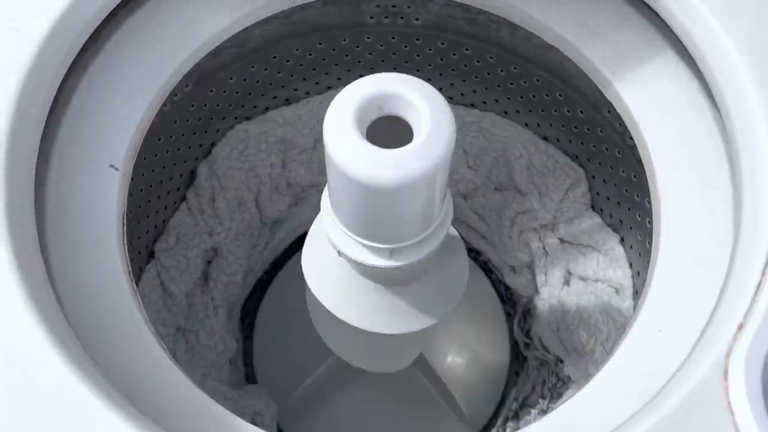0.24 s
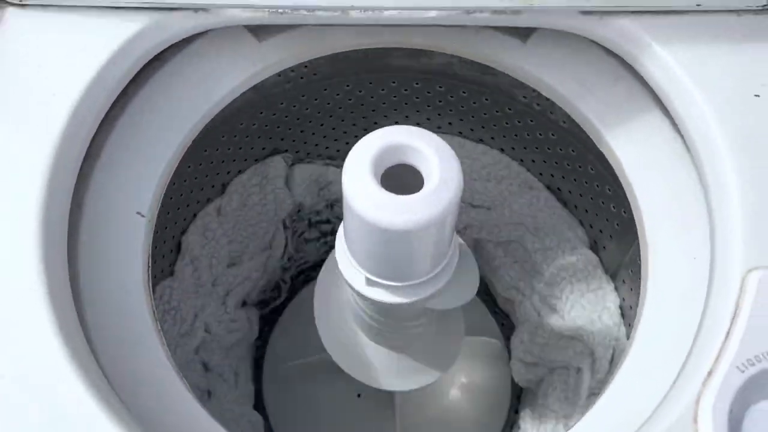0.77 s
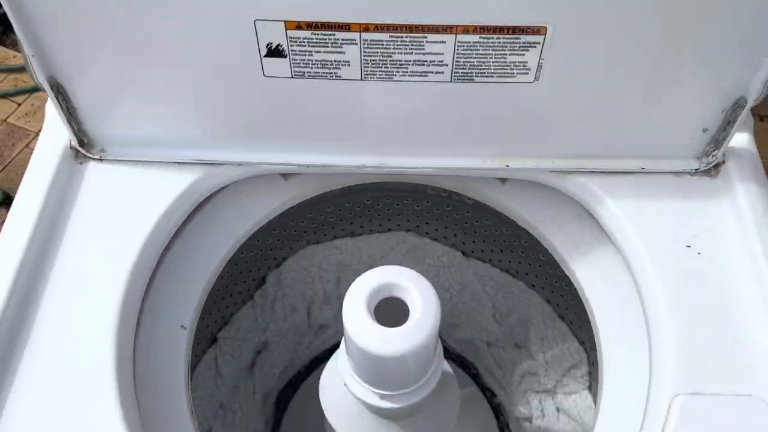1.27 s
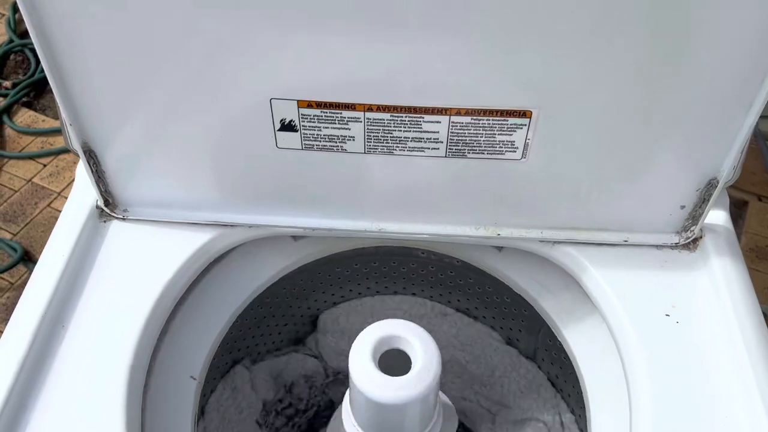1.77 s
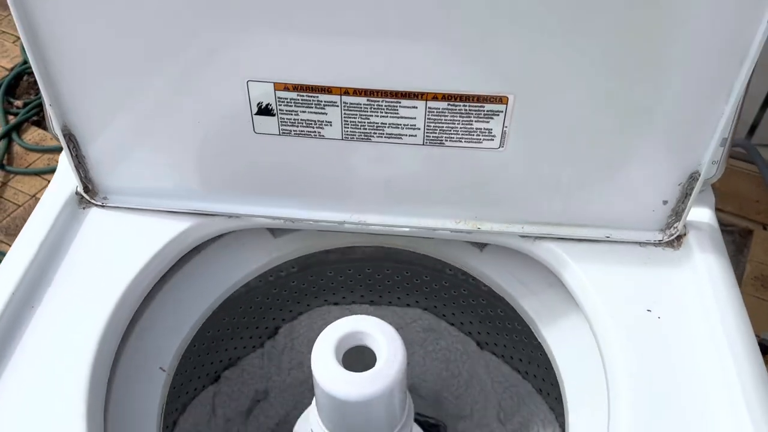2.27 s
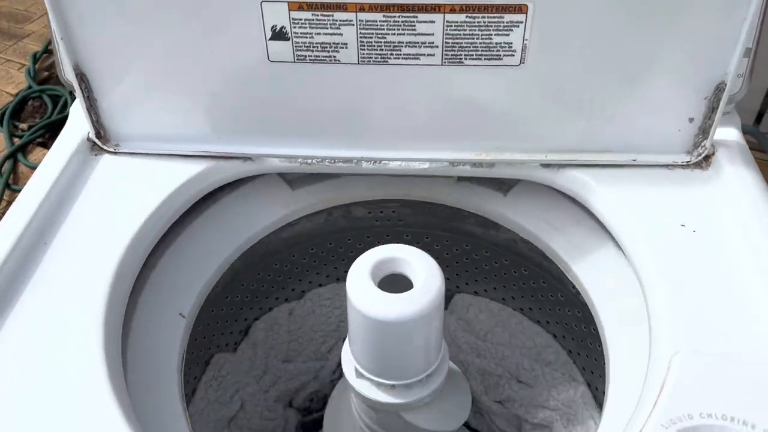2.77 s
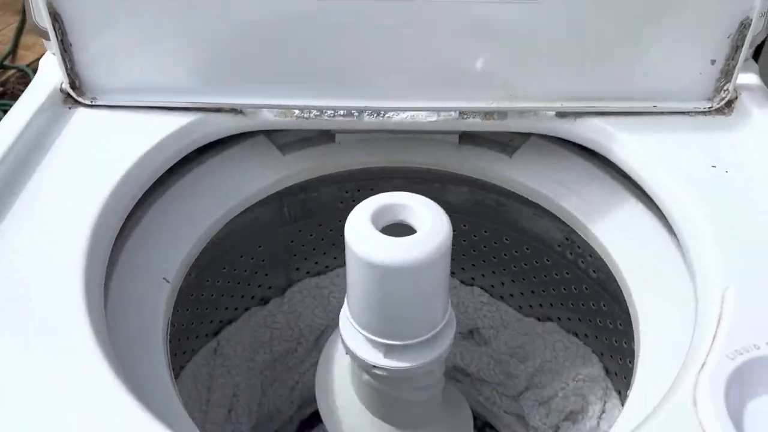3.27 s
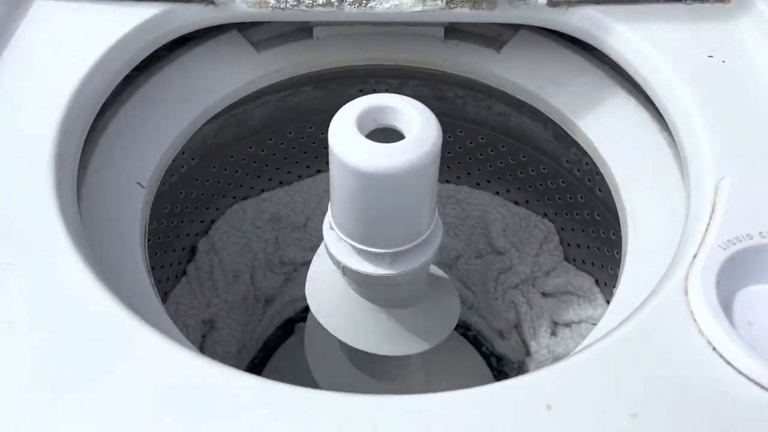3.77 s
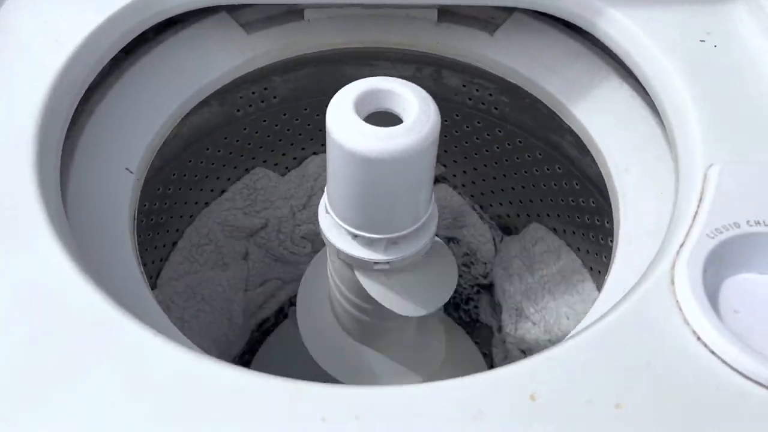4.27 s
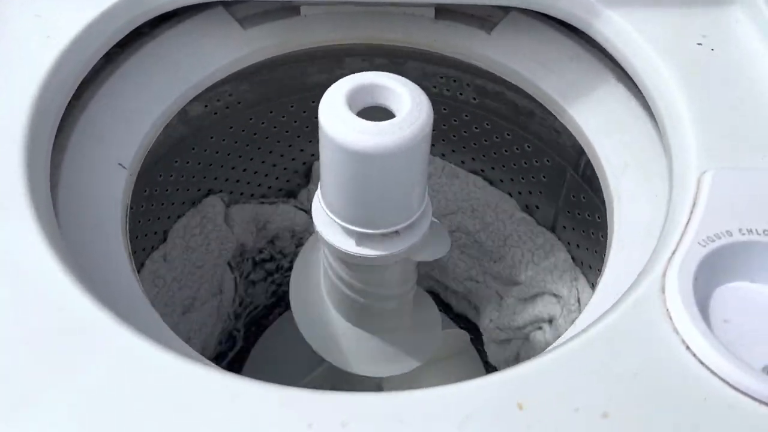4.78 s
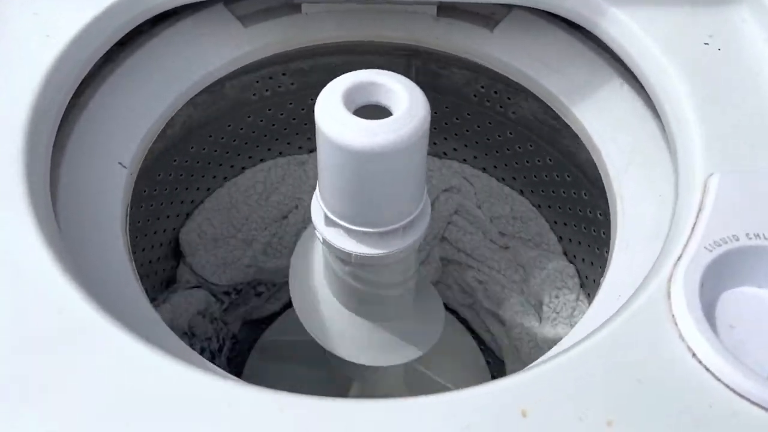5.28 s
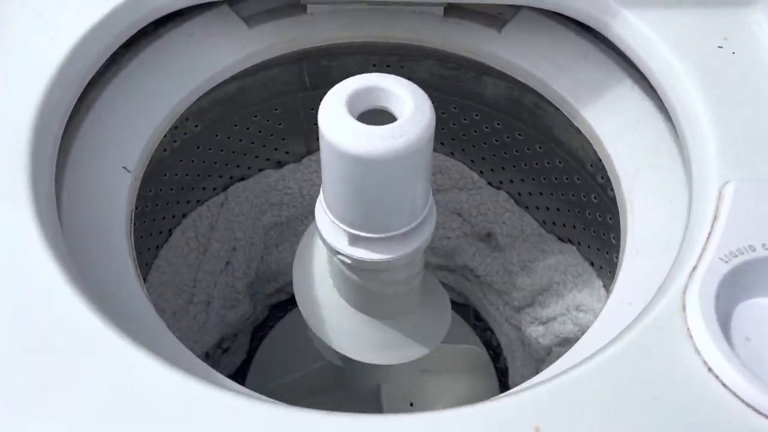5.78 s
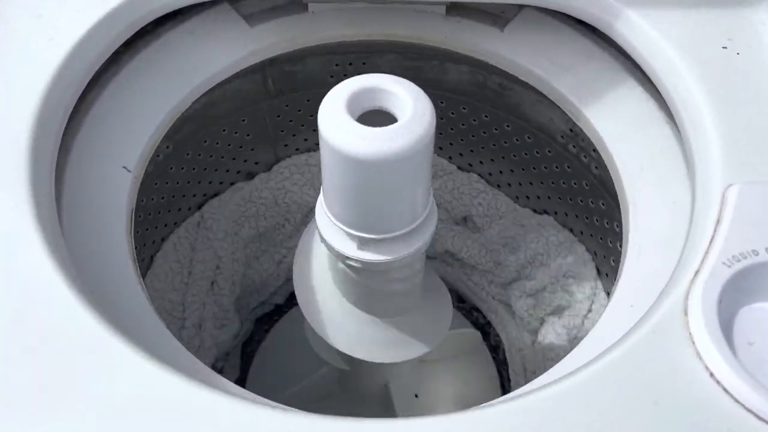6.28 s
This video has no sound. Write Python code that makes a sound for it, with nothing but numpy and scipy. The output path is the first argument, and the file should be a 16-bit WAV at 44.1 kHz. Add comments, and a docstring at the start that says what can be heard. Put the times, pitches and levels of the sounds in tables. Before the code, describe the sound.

Close above an open washer turning wet towels: a strong 100 hertz motor hum, rough drive rumble, wavering bearing whine and rubs repeating about three times a second, with water hissing in the tub. The handheld microphone draws back after one second, air puffs thump against it, then it partly returns as soft knocks and brief scrapes appear.

```python
"""Just above an open top-load washer that turns its basket of wet towels about three times a second.
At first the hand-held microphone is close: motor hum, drive rumble, a rub at each place of the turn, hissing water.
From about 1 s it draws back, farthest near 2 s, while gusts and puffs of air buffet it; then the hum throbs.
It comes part of the way back; the tub knocks now and then, puffs go on, and late on it scrapes too.
Tones are sines with wandering phase, rushing sounds are shaped noise, ticks and knocks are struck resonances."""
import sys
import numpy as np
from scipy import signal
from scipy.fft import rfft, irfft
from scipy.io import wavfile

SR = 44100
rng = np.random.default_rng(int(sys.argv[2]) if len(sys.argv) > 2 else 0)


def master_out(mix):
    """Clip the mix to full scale and print it as 16-bit PCM to the path in sys.argv[1]."""
    frames = np.transpose(np.atleast_2d(mix))
    ceiling = np.clip(frames, -1, 1)
    pcm = np.round(ceiling * 32767).astype(np.int16)
    wavfile.write(sys.argv[1], SR, pcm)


N = 288414

TIME = np.arange(N) / SR
BINS = np.maximum(np.fft.rfftfreq(N, 1 / SR), 1)   # Hz, kept above zero for the logarithm
AROUND = np.arange(-SR // 8, SR // 8) / SR   # seconds around a short event
TURNS_PER_S = 2.954   # basket

# distance of the microphone from the tub: [t/s, share drawn back 0-1]
DRAWN_BACK = [(0, 0.06), (.75, 0.23), (1.3, 0.65), (1.85, 0.74), (2.3, 0.74), (2.8, 0.51), (4.2, 0.4),
              (6.54, 0.37)]
# relative strength of the drive's growl, rubs and shaft tones: [t/s, level/dB]
GROWL = [(0, 2.5), (1.0, -0.5), (1.8, 0.5), (2.7, -0.2), (3.9, 0.4), (4.8, 0.5), (5.7, 1.5), (6.5, 1)]


def from_db(db):
    """Decibels to gain."""
    return 10 ** (np.asarray(db) / 20)


def in_time(rows):
    """A curve read at every sample."""
    return np.interp(TIME, *np.transpose(rows))


def at_hz(points, hz):
    """A spectrum read on a log-frequency axis."""
    known_hz, values = np.transpose(points)
    return np.interp(np.log(hz), np.log(known_hz), values)


def pan(lean_db):
    """Left and right gains; positive leans left."""
    return from_db(np.array([[.5], [-.5]]) * lean_db)


def bump(offset, length):
    """A smooth bell-shaped rise and fall, height 1; the length is its standard deviation."""
    return np.exp(-.5 * (offset / length) ** 2)


def drift(rate, size=40):
    """Slow chance of spread 1: noise drawn once per size samples, twice low-passed at rate Hz."""
    run_in = size * size
    r = np.exp(-2 * np.pi * rate * size / SR)
    draws = rng.standard_normal(N // size + run_in + 2)
    slow = signal.lfilter([1], [1, -2 * r, r * r], draws)[run_in:]
    return np.interp(np.arange(N) / size, np.arange(len(slow)), slow / slow.std())


def spread(mid, side, hz):
    """Two unrelated sounds become left and right, with width and lean that depend on pitch."""
    # stereo width before the lean: [f/Hz, side minus mid level/dB]
    width = [(60, -29.5), (200, -18.5), (380, -12), (700, -8), (1290, -2), (2400, -6.5), (4400, -5.5),
             (8000, -4.5), (15000, 17.5)]
    # balance: [f/Hz, left minus right level/dB]
    balance = [(110, -5), (200, 0.5), (380, 1), (700, -1.5), (1290, 1), (2400, 2), (4400, 5.5), (8100, 0),
               (14000, -2)]
    return (mid + from_db(at_hz(width, hz)) * side * [[1], [-1]]) * pan(at_hz(balance, hz))


def noise(close, far):
    """Stereo noise whose amplitude per root Hz turns from one colour to another as the microphone draws back."""
    both = spread(*rfft(rng.standard_normal((2, N))) * np.sqrt(SR / 2), BINS)
    back = in_time(DRAWN_BACK)
    return (1 - back) * irfft(both * close, N) + back * irfft(both * far, N)


def band_noise(low_hz, high_hz, side_db):
    """Stereo noise in one band; its mid has rms 1."""
    sos = signal.butter(2, [low_hz, min(high_hz, SR / 2 - 1)], "band", fs=SR, output="sos")
    mid, side = signal.sosfilt(sos, rng.standard_normal((2, N)))
    return (mid + from_db(side_db) * side * [[1], [-1]]) / mid.std()


def ring(clicks, hz, width_hz):
    """A unit click sets a decaying sine ringing, of starting height 1; a wider resonance dies faster."""
    r, w = np.exp(-np.pi * width_hz / SR), 2 * np.pi * hz / SR
    return signal.lfilter([0, np.sin(w)], [1, -2 * r * np.cos(w), r * r], clicks + 1e-18)


def eddy(length, hz, sag_per_s, phase):
    """A few swinging cycles that glide in pitch, downwards for a positive sag."""
    gliding_hz = hz * (1 - np.tanh(sag_per_s * AROUND) / 2)
    return bump(AROUND, length) * np.sin(2 * np.pi * (np.cumsum(gliding_hz) / SR + phase))


def add(out, s, sound):
    """Mix a short sound into a track, centred on its moment."""
    at = round(s * SR) + (AROUND * SR).round().astype(int)
    inside = (at >= 0) & (at < N)
    out[at[inside]] += sound[inside]


def sliding_tone(hz, width_hz, rough):
    """Two unrelated tones on one pitch track, wandering a little and blurred by friction; rms about 1."""
    wander = np.array([drift(1.53), drift(0.93)])
    phase = 2 * np.pi * (np.cumsum(hz) / SR + rng.random((2, 1))) + np.pi / 2 * wander
    blur = np.array([drift(width_hz) + 1j * drift(width_hz) for _ in range(2)]) / np.sqrt(2)
    return (np.exp(1j * phase) * (1 + rough * blur)).real * np.sqrt(2 / (1 + rough ** 2))


def past(place):
    """Share of a turn since the basket passed this place, from -1/2 to 1/2."""
    return (TURNS_PER_S * TIME - place + .5) % 1 - .5


def nearness(loss_db):
    """Gain of a source that loses so much when the microphone is drawn fully back."""
    return from_db(-loss_db * in_time(DRAWN_BACK))


def airflow(calm_db=-47.5):
    """Relative strength of the air at the microphone: calm, with gusts that swell and fade."""
    # gusts over the microphone: [t/s, half length/s, relative level/dB]
    gusts = [(1.0, 0.088, -35), (1.3, 0.12, -36.5), (1.75, 0.26, -33.5), (2.25, 0.21, -38),
             (3.72, 0.3, -41)]
    return from_db(calm_db) + sum(from_db(db) * bump(TIME - s, length) for s, length, db in gusts)


def high_hiss(side_db=-13, left_lag_s=.000081):
    """A smooth hiss at the very top reaches the left side a moment late."""
    # thin hiss: [f/Hz, relative level per Hz/dB]
    colour = [(10700, -130), (11200, -101), (12200, -93), (14000, -92), (15000, -92), (16000, -97.5)]
    # its strength: [t/s, relative level/dB]
    strength = [(0, 3.5), (.5, 2.5), (1.25, -1), (1.72, -2.5), (1.85, -4.5), (2.4, -3), (3.3, -1),
                (4.4, -1.5), (6.5, -2.3)]
    mid, side = rfft(rng.standard_normal((2, N))) * from_db(at_hz(colour, BINS)) * np.sqrt(SR / 2)
    other = from_db(side_db) * side
    left = (mid + other) * np.exp(-2 * np.pi * 1j * BINS * left_lag_s)
    return irfft(np.array([left, mid - other]), N) * from_db(in_time(strength))


def spray(level_db=-0.97, loss_db=3.0, flicker_db=.5, surge_db=0.41):
    """Water flung through the basket's holes hisses in the hollow tub, now and then in a swish."""
    # hiss of the water: [f/Hz, relative level per Hz/dB]
    colour = [(500, -94), (1250, -76.5), (1800, -80), (2500, -81.5), (3100, -84), (4000, -86.5),
              (5300, -86.5), (6400, -90.5), (8400, -95.5), (9400, -108), (10200, -130)]
    # air resonances of the open tub: [f/Hz, full width/Hz, level added close/dB, added drawn fully back/dB]
    tub_air = [(1720, 150, 1.5, 2.5), (1900, 160, -0.5, -1.5), (2090, 200, -0.5, 1.5), (2300, 120, 0.5, -2),
               (2600, 130, 3.5, -5), (2870, 400, -.5, -1), (3570, 200, 1.1, 0), (4800, 300, 1, -1),
               (5330, 200, 0.5, -3), (5850, 300, -1.5, -1.5), (7100, 1600, -1.5, 2)]
    # swishes: [t/s, half length/s, lowest f/Hz, highest f/Hz, relative level/dB]
    swishes = [(.41, .03, 3500, 6000, -56), (.61, 0.015, 2500, 6000, -51), (.79, .04, 1500, 2600, -54),
               (2.27, 0.033, 1700, 3000, -52.5), (2.485, 0.035, 2000, 7800, -50),
               (5.193, 0.098, 2100, 3400, -54), (5.293, 0.022, 2200, 5000, -52),
               (5.38, 0.18, 4800, 6850, -58), (6.086, 0.027, 2000, 3200, -53),
               (6.3, 0.048, 1900, 3100, -54)]
    close_db = far_db = at_hz(colour, BINS)
    for hz, width_hz, above_db, back_db in tub_air:
        peak = 1 / (1 + (2 * (BINS - hz) / width_hz) ** 2)
        close_db, far_db = close_db + above_db * peak, far_db + back_db * peak
    flow = nearness(loss_db) * from_db(level_db + flicker_db * drift(40) + surge_db * drift(7.5))
    surges = 0
    for s, length, low_hz, high_hz, db in swishes:
        surges = surges + from_db(db) * bump(TIME - s, length) * band_noise(low_hz, high_hz, side_db=-4.0)
    soften = signal.butter(10, 8800, fs=SR, output="sos")
    return noise(from_db(close_db), from_db(far_db)) * flow + signal.sosfilt(soften, surges)


def drops(per_s=45, patter_db=-50, scatter_db=5.5, soft_hz=7000):
    """A few clear drops over a faint random patter; each strikes the tub's modes differently."""
    # clear drops on the tub: [t/s, strike level/dB]
    strikes = [(0.6094, -39), (3.975, -34), (4.4294, -38), (5.281, -34), (5.4824, -38)]
    # what a drop rings with: [f/Hz, width/Hz, relative level/dB]
    tub_modes = [(870, 180, -8), (1720, 350, -18), (2400, 340, -7), (3870, 380, -10.5), (5370, 720, -5.5)]
    clicks = (rng.random(N) < per_s / SR) * from_db(patter_db + scatter_db * rng.standard_normal(N))
    for s, db in strikes:
        clicks[round(s * SR)] += from_db(db)
    rings = 0
    for hz, width_hz, db in tub_modes:
        # a random sign shared by both sides, and a part of each side's own
        strength = rng.choice([-1, 1], N) + 0.76 * rng.standard_normal((2, N))
        rings = rings + from_db(db) * ring(clicks * strength, hz, width_hz)
    return signal.sosfilt(signal.butter(6, soft_hz, fs=SR, output="sos"), rings)


def gulps(level_db=-2.0, half_length_s=.014, sag_per_s=3.996, churn_db=-33.5, scatter_db=2.5,
          low_hz=230, high_hz=390, count=50):
    """Pockets of water slosh, each a few cycles of a gliding tone: clear gulps over a random churn."""
    # clear gulps: [t/s, f/Hz, peak level before the trim/dB]
    clear = [(0.309, 301, -27), (0.915, 322, -28), (1.22, 290, -30), (1.35, 322, -26), (1.685, 290, -28),
             (1.901, 280, -23.5), (2.07, 333, -26), (2.64, 301, -26), (3.309, 279, -27), (3.46, 349, -27.5),
             (4.46, 312, -26.5), (4.628, 317, -33), (5.461, 226, -24), (5.67, 285, -27), (6.02, 306, -25)]
    out = np.zeros(N)
    for (s, hz, db), phase in zip(clear, rng.random(len(clear))):
        add(out, s, from_db(db + level_db) * eddy(half_length_s, hz, sag_per_s, phase))
    for when, pitch, strength, glide, phase in rng.random((count, 5)):
        hz = low_hz * (high_hz / low_hz) ** pitch
        sag = sag_per_s * 2 * (2 * glide - 1)   # churn glides up or down
        gain = from_db(churn_db + scatter_db * (2 * strength - 1.5))
        add(out, when * N / SR, gain * eddy(half_length_s, hz, sag, phase))
    return out


def wind(level_db=5.0, rustle_db=-8.0):
    """Air moving over the microphone: low turbulence with a lighter rustle, stronger in the gusts."""
    air = band_noise(50, 115, side_db=-2.0) + from_db(rustle_db) * band_noise(140, 290, side_db=-7.5)
    return air * airflow() * from_db(level_db)


def buffets(flap_db=-2.5, thump_db=1.6, sag_per_s=13.7, ragged=.18, thump_hz=54, thump_s=0.013):
    """Each buffet is a ragged swing of air: a quick falling flap, with a low thump mostly just after."""
    # puffs: [t/s, flap f/Hz, flap half length/s, flap level/dB, thump delay/s, thump level/dB], before trims
    puffs = [(0.894, 130, .007, -33, 0.0047, -25), (1.047, 169.2, 0.0069, -14, 0.028, -15.5),
             (1.175, 130.5, .006, -28, 0.0094, -29), (1.225, 148.6, .007, -27, 0.022, -28),
             (1.35, 198, .012, -31, .015, -37), (1.446, 195.4, .012, -15.5, 0.032, -24),
             (1.556, 198.8, 0.0036, -15.5, 0.017, -31), (1.632, 138, .008, -24, 0.027, -26),
             (1.735, 170.6, .009, -27, 0.025, -28), (1.852, 140, 0.0055, -32, 0.029, -22),
             (1.95, 171, 0.0081, -21, -0.0094, -30), (2.41, 148, 0.0084, -21.5, 0.037, -29),
             (2.95, 150, 0.0073, -38, 0.015, -29), (3.425, 140, 0.0066, -35, 0.0071, -29),
             (3.67, 159, 0.0038, -23, 0.039, -27), (3.747, 150.7, 0.005, -13, .006, -15.5),
             (3.767, 250, .01, -23, 0.0055, -29), (4.115, 151.5, 0.0065, -24.5, -0.016, -26.5),
             (4.314, 140, .008, -35, 0.024, -20), (4.34, 163, .007, -23, 0.028, -24),
             (4.755, 154, .007, -24, .013, -26), (5.73, 149, .008, -27, .005, -31)]
    swing, strength = np.zeros((2, N))
    for (s, hz, length, high_db, lag, low_db), phase in zip(puffs, rng.random((len(puffs), 2))):
        flap, thump = from_db(high_db + flap_db), from_db(low_db + thump_db)
        add(swing, s, flap * eddy(length, hz, sag_per_s, phase[0]))
        add(swing, s + lag, thump * eddy(thump_s, thump_hz, sag_per_s, phase[1]))
        add(strength, s, flap * bump(AROUND, 2 * length))
    return swing + ragged * strength * band_noise(41, 330, side_db=-4.0)


def scrapes(half_length_s=0.024, rise_per_s=7.0):
    """The tub slides on its supports with a brief rising tone."""
    # scrapes just after some of the knocks: [t/s, f/Hz, peak level/dB]
    slides = [(4.9, 590, -37.5), (5.93, 595, -36), (6.29, 570, -38)]
    out = np.zeros(N)
    for (s, hz, db), phase in zip(slides, rng.random(len(slides))):
        add(out, s, from_db(db) * eddy(half_length_s, hz, -rise_per_s, phase))
    return out


def knocks(level_db=1.5, lean_db=-2.0, width_hz=110):
    """The swaying tub nudges its supports: a soft contact that dies within a few cycles."""
    # light knocks: [t/s, f/Hz, strike level before the trim/dB]
    nudges = [(2.436, 790, -33), (3.018, 680, -19.5), (4.224, 550, -27), (4.876, 550, -24),
              (4.916, 660, -30), (5.482, 670, -29), (5.909, 625, -25), (6.273, 644, -21)]
    rings = 0
    for s, hz, db in nudges:
        click = np.arange(N) == round(s * SR)
        rings = rings + from_db(db + level_db) * ring(click, hz, width_hz)
    return signal.sosfilt(signal.butter(2, 1800, fs=SR, output="sos"), rings) * pan(lean_db)


def under_whine(centre_hz=662, swing_hz=11, lowest_at=0.781):
    """A softer strand below the whine never stops and only sways in pitch with the turn."""
    # its strength: [t/s, relative level/dB]
    strength = [(0, -50.5), (.9, -45.5), (1.4, -43.5), (1.8, -52.5), (2.15, -47), (3.0, -49), (6.5, -48.5)]
    hz = centre_hz - swing_hz * np.cos(2 * np.pi * past(lowest_at))
    return spread(*sliding_tone(hz, 16, rough=.75), centre_hz) * from_db(in_time(strength))


def whine(centre_hz=711, swing_hz=41, highest_at=0.93, loudest_at=0.11):
    """A bearing whine arches up and down with every turn; it swells at the crest and is loudest as it falls."""
    # its strength before the swell of each turn: [t/s, relative level/dB]
    strength = [(0, -34.5), (1.03, -41.5), (1.3, -40), (1.8, -45.5), (2.05, -41), (2.7, -38.5), (3.4, -38),
                (4.1, -35.5), (5.3, -38.5), (6.1, -36), (6.5, -36.5)]
    hz = centre_hz + swing_hz * (2 * bump(past(highest_at), .16) - 1)
    mid, side = sliding_tone(hz, 35, rough=.9)
    pressure = .33 + .7 * bump(past(loudest_at), .06) + .4 * bump(past(highest_at), .075)
    return spread(mid, side, centre_hz) * pressure * from_db(in_time(strength))


def shaft(motor_hz=24.09, swing=0.027, fastest_at=0.95, blur_hz=6, rough=.7):
    """The motor's overtones weave up and down together as the uneven load swings its speed on every turn."""
    # overtones of the motor shaft: [multiple of its speed, relative level/dB]
    orders = [(2, -44.5), (5, -39), (6, -40), (10, -42.5), (11, -46), (12, -44), (14, -43), (18, -48.5)]
    speed_hz = motor_hz * (1 + swing * np.cos(2 * np.pi * past(fastest_at)))
    out = 0
    for k, db in orders:
        mid, side = sliding_tone(round(k) * speed_hz, blur_hz, rough)
        out = out + from_db(db) * spread(mid, side, k * motor_hz)
    return out


def basket(level_db=0.45, rough=1.0, half_length_turns=0.072, width_hz=18, sag_hz_per_turn=51):
    """Each rub comes round once a turn and excites a narrow resonance that sags as it passes."""
    # rubs: [place in the turn 0-1, f/Hz, relative level/dB]
    rubs = [(0, 592.6, -45.5), (.10, 242.1, -37), (0.121, 325.8, -37.5), (.25, 249.3, -39),
            (0.281, 701, -43), (.28, 1090, -49.5), (.47, 556, -47), (0.571, 340, -40.5), (.72, 418.7, -44),
            (.74, 650, -41), (.76, 295.4, -38), (.87, 1026, -50.5)]
    out = np.zeros((2, N))
    for place, hz, db in rubs:
        mid, side = sliding_tone(hz - sag_hz_per_turn * past(place), width_hz, rough)
        out += spread(mid, side, hz) * bump(past(place), half_length_turns) * from_db(db + level_db)
    return out


def cabinet(level_db=-10.5, growl_db=-1.5, surge_db=0.5, flutter_db=1.06, growl_below_hz=480):
    """Belt and bearings rumble through panel resonances: a slowly surging growl under a quickly fluttering rush."""
    # broad rumble of the drive: [f/Hz, relative level per Hz/dB]
    rumble = [(20, -91.5), (45, -73.5), (110, -52.5), (180, -59.5), (330, -51.5), (500, -55.5), (700, -57),
              (1000, -59), (1400, -77.5), (3000, -100)]
    # cabinet and tub resonances: [f/Hz, half width/Hz, relative level per Hz/dB, gain drawn fully back/dB]
    panels = [(57, 8.2, -59, -0.5), (86, 16, -56, 1), (162, 18, -45.5, 3), (210, 7.4, -62.5, -3),
              (230, 24, -44.5, -3.5), (278, 42, -58, -4), (340, 73, -50, 4.5), (413, 34, -56, 0),
              (420, 19, -50.5, -1), (498, 19, -70.5, -2), (553, 36, -57, 0), (640, 24, -55, 5),
              (733, 71, -50, -9), (745, 42, -62, 1), (873, 55, -56.5, -3.5), (1073, 60, -68.5, 12.5),
              (1000, 30, -60, -6)]
    close = far = from_db(at_hz(rumble, BINS)) ** 2   # power
    for hz, width_hz, db, back_db in panels:
        peak = from_db(db) / (1 + ((BINS - hz) / width_hz) ** 2)
        close, far = close + peak ** 2, far + (peak * from_db(back_db)) ** 2
    low = 1 / (1 + (BINS / growl_below_hz) ** 10)   # share of the power that growls
    growl_level = from_db(growl_db + in_time(GROWL) + surge_db * drift(5.5))
    growl = noise(np.sqrt(close * low), np.sqrt(far * low)) * growl_level
    rush = noise(np.sqrt(close * (1 - low)), np.sqrt(far * (1 - low))) * from_db(flutter_db * drift(25))
    return (growl + rush) * from_db(level_db)


def motor(hum_hz=100.04, level_db=-0.15, flutter_db=0.38, wobble_rad=0.075, lag_rad=-0.016, waver=4.3,
          lean_db=1.25, lean_loss_db=1.0):
    """Magnetic pull at twice the mains frequency shakes the cabinet; the tone wavers more in moving air."""
    # hum at the microphone before the trim: [t/s, relative level/dB]
    strength = [(0, -10), (.22, -13), (.44, -10), (.52, -12.5), (.62, -10), (.67, -12.5), (.73, -11),
                (.85, -14), (1.2, -14.5), (1.44, -15), (1.59, -12.8), (1.75, -14), (1.85, -17),
                (2.05, -16.5), (2.2, -14), (2.37, -14), (2.41, -17), (2.5, -14.5), (2.89, -14),
                (2.97, -11.5), (3.66, -10.5), (3.745, -13.5), (3.78, -11), (4.15, -12), (6.5, -12.5)]
    # overtones: [multiple of the hum, mean level relative to the hum/dB]
    overtones = [(2, -37.5), (3, -42.5)]
    phase = 2 * np.pi * hum_hz * TIME + wobble_rad * drift(7.6) + lag_rad * np.array([[.5], [-.5]])
    tone = np.sin(phase)
    for k, db in overtones:
        tone = tone + from_db(db + 2 * drift(3.6)) * np.sin(round(k) * phase)
    unsteady = 1 + waver * airflow() * np.array([drift(9.0), drift(25)])   # each side its own way
    # a spell in which the hum throbs
    throb_at_s, throb_half_s, throbs_per_s, throb_depth_db = 2.366, 0.42, 7, 2.1
    since = TIME - throb_at_s
    throb_db = throb_depth_db * bump(since, throb_half_s) * np.cos(2 * np.pi * throbs_per_s * since)
    level = from_db(in_time(strength) + level_db + throb_db + flutter_db * drift(8.2))
    return np.sqrt(2) * tone * unsteady * level * pan(lean_db - lean_loss_db * in_time(DRAWN_BACK))


def scene(drive_loss_db=5.5):
    """The machine, the water in it and the air above it."""
    water = high_hiss() + spray() + drops() + gulps()
    air = wind() + buffets()
    drive = cabinet() + (basket() + shaft()) * from_db(in_time(GROWL))
    machine = scrapes() + knocks() + under_whine() + whine() + nearness(drive_loss_db) * drive + motor()
    return water + air + machine


def record(dry):
    """The microphone sheds the deepest bass; the top is cut steeply."""
    without_bass = signal.sosfilt(signal.butter(3, 36, "high", fs=SR, output="sos"), dry)
    return signal.sosfilt(signal.ellip(12, .1, 90, 15750, fs=SR, output="sos"), without_bass)


dry = scene()
out = record(dry)
master_out(out)
```